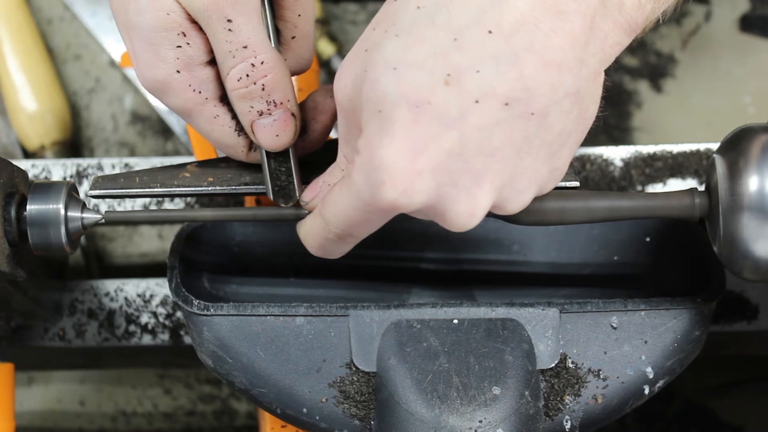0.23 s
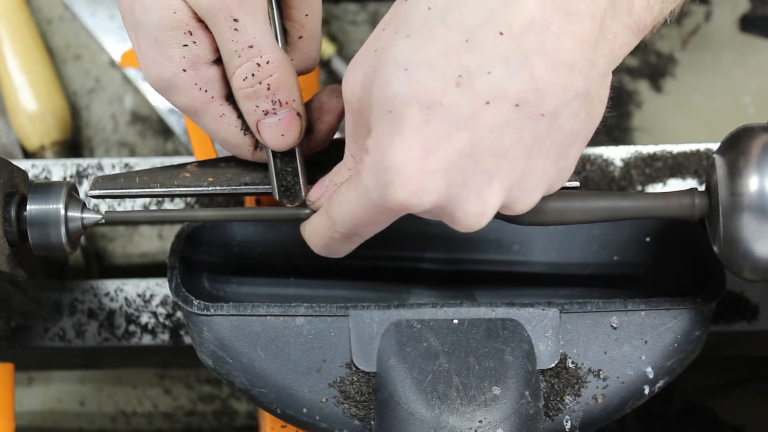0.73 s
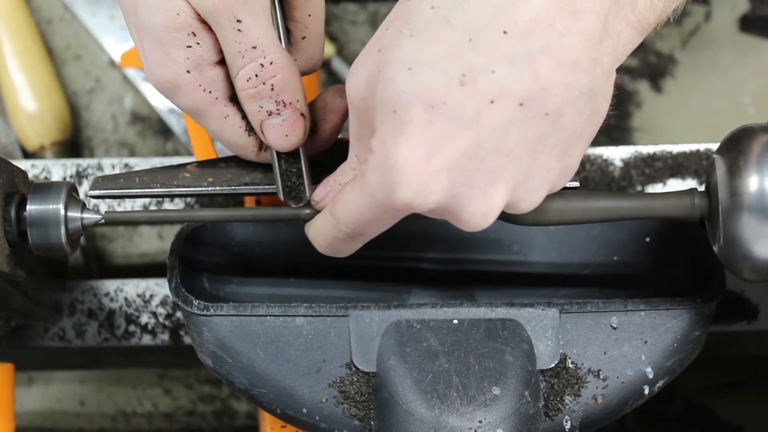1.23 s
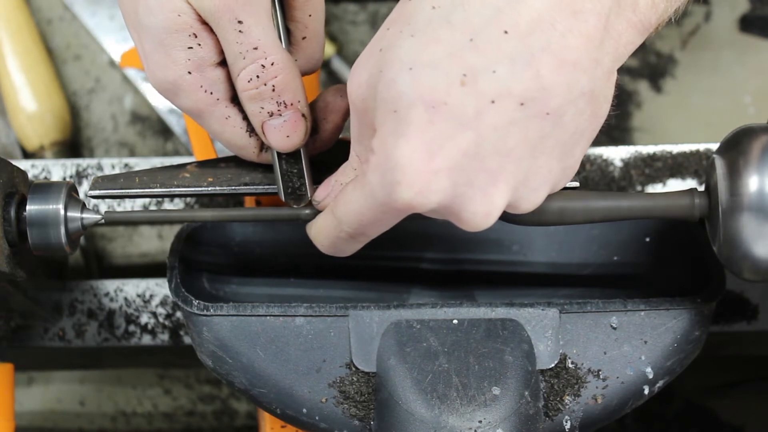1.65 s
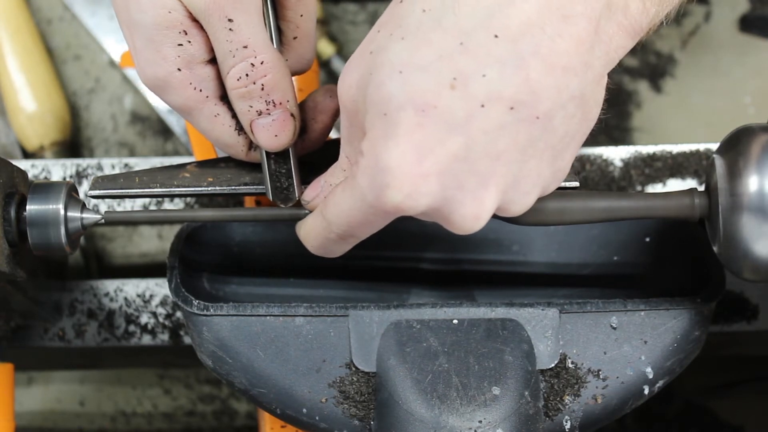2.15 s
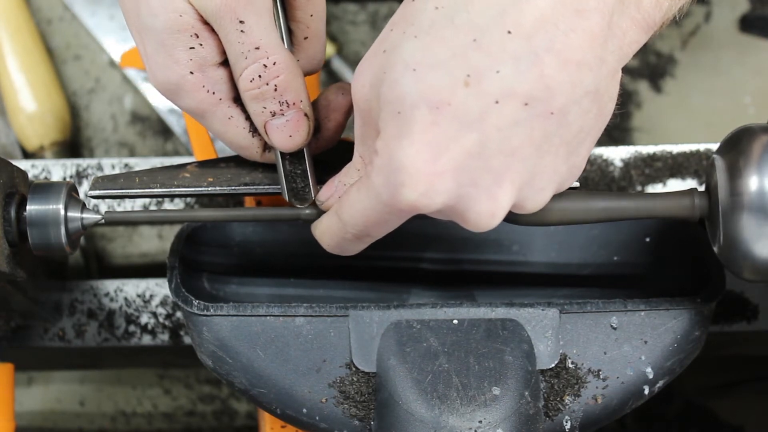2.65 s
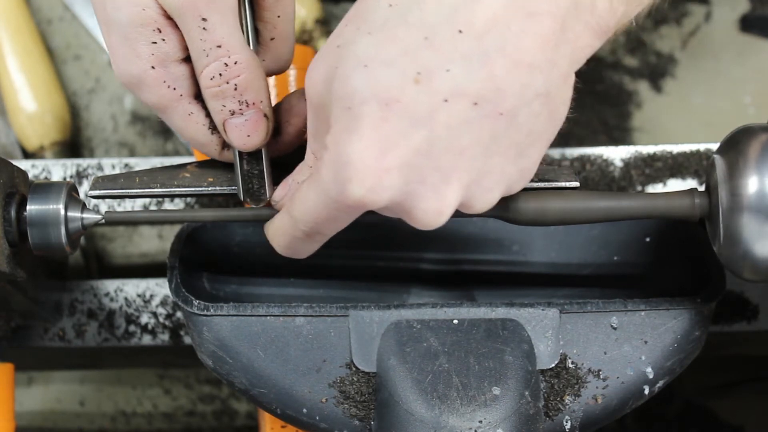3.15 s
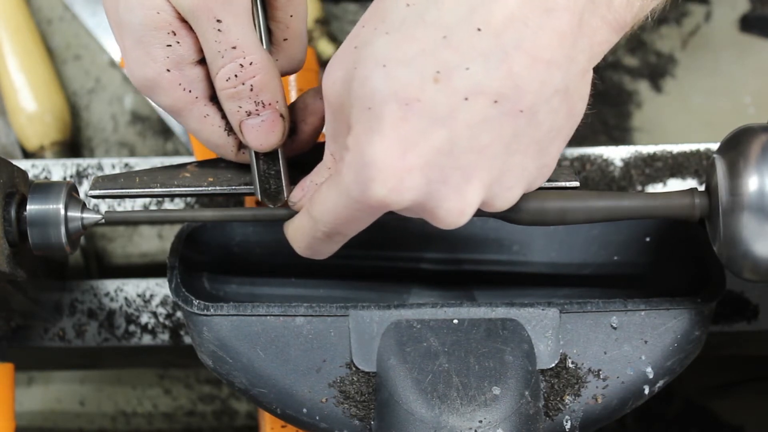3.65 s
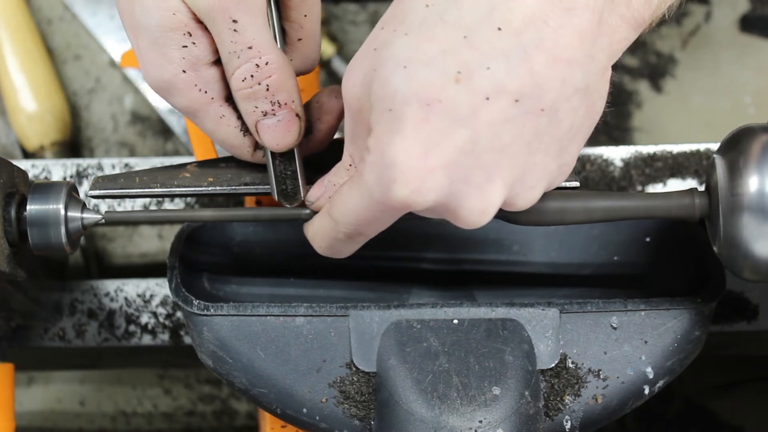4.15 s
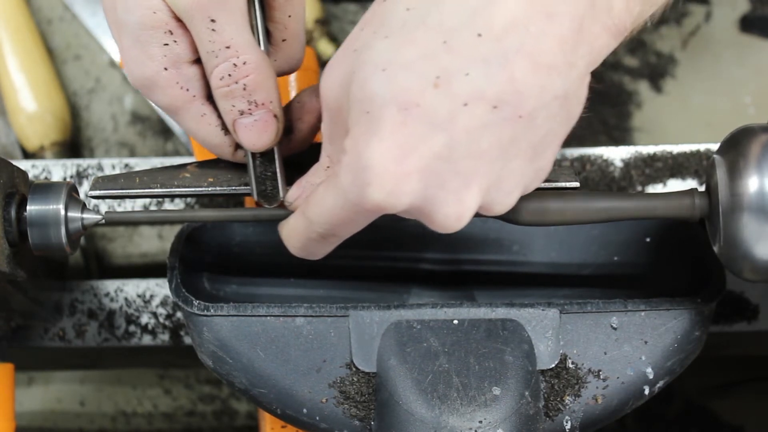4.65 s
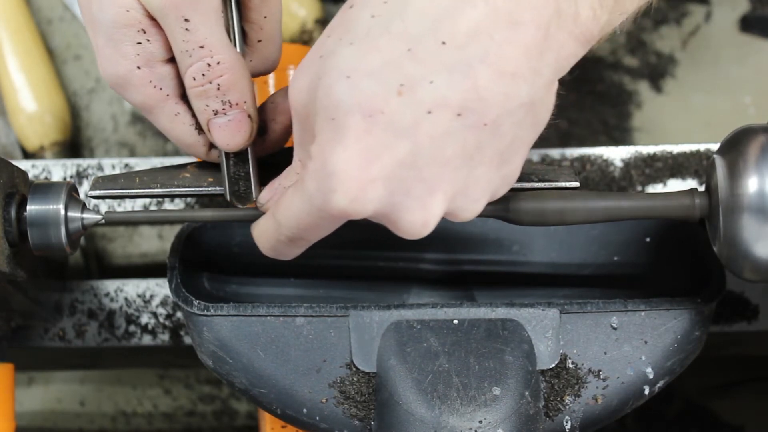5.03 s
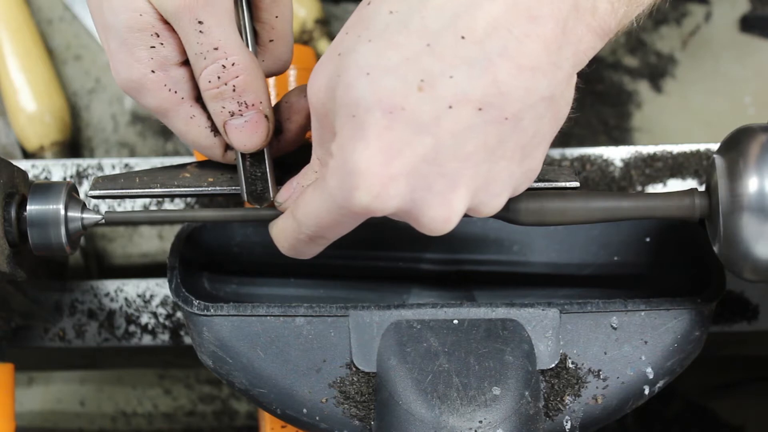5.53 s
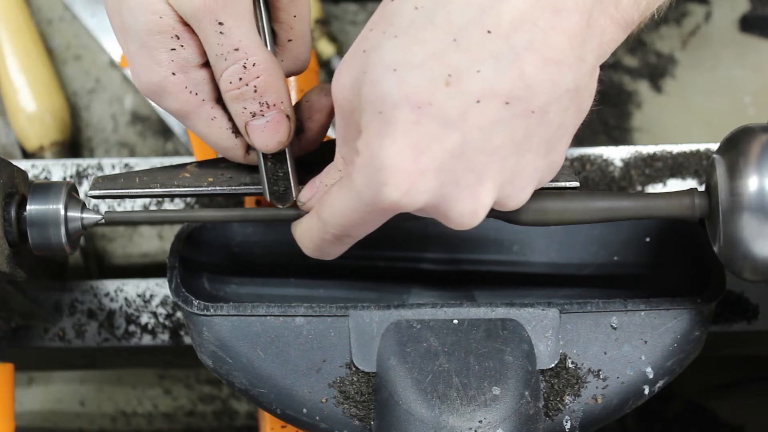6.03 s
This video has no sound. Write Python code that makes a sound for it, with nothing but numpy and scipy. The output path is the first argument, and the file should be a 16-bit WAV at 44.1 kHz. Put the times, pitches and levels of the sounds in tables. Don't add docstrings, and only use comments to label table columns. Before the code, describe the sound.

In a workshop, steel calipers press on a wooden blank turning in a lathe. A very high, glassy squeak flickers in short irregular strokes, dipping and biting again, with tiny chirps and wooden creaks. Around five seconds it drops to a lower, harder squeal, then returns high and dense. A faint low motor hum and soft hiss run beneath. The microphone is close and dry, without audible room.

```python
import sys
import numpy as np
from scipy import signal
from scipy.fft import rfft, irfft, next_fast_len
from scipy.io import wavfile
from scipy.ndimage import uniform_filter1d

SR = 44100
rng = np.random.default_rng(int(sys.argv[2]) if len(sys.argv) > 2 else 0)


def output_pcm(signal):
    pcm = np.clip(np.atleast_2d(signal).T, -1, 1) * 32767
    wavfile.write(sys.argv[1], SR, np.round(pcm).astype(np.int16))


def elevation(decibels):
    levels = np.asarray(decibels, float)
    return 10 ** (levels / 20)


N = 277387


def in_time(rows):
    s, *columns = np.transpose(rows)
    return [np.interp(np.arange(N) / SR, s, c) for c in columns]


def rms_one(x):
    return x / np.sqrt(np.mean(np.abs(x) ** 2) + 1e-20)


def low_pass(x, cut_hz, order):
    return signal.sosfilt(signal.butter(order, cut_hz, fs=SR, output="sos"), x)


def drift(rate_hz):
    smooth = signal.butter(2, rate_hz, fs=SR / 50, output="sos")
    coarse = signal.sosfilt(smooth, rng.standard_normal(N // 50 + 2002))
    settled = rms_one(coarse[2000:])
    return np.interp(np.arange(N) / 50, np.arange(N // 50 + 2), settled)


# frequency in Hz, level in dB per Hz.
HISS_SPECTRUM = [(110, -2), (150, -8), (370, -10), (520, 1), (640, -5.5), (720, -6.5), (950, -9),
                 (1300, -1), (2700, -10), (4300, -2), (6200, -4), (8300, -5.5), (9600, -16), (13400, -30)]
HISS_DB = -5


def hiss():
    hz, db = np.transpose(HISS_SPECTRUM)
    size = next_fast_len(N, True)
    grid = np.maximum(np.fft.rfftfreq(size, 1 / SR), 1)
    colour = elevation(np.interp(np.log(grid), np.log(hz), db))
    noise = irfft(rfft(rng.standard_normal(size)) * colour, size)[:N]
    return elevation(HISS_DB) * rms_one(noise)


# lower edge in Hz, upper edge in Hz, # squeak
# level in dB at which the band drops out, averaging time in seconds.
GAPPED_BANDS = [(9050, 9600, -41, .04), (9600, 10500, -44, .05), (10500, 11500, -43, .06),
                (11500, 12500, -41, .2), (12500, 14500, -41, .25)]


def gapped(quiet, squeak, soft_db=3.0, ragged_db=3.5):
    size = next_fast_len(N, True)
    spectrum, grid = rfft(quiet, size), np.fft.rfftfreq(size, 1 / SR)
    power_db = 10 * np.log10(uniform_filter1d(squeak ** 2, SR // 50) + 1e-12)
    for low_hz, high_hz, over_db, hold_s in GAPPED_BANDS:
        level_db = uniform_filter1d(power_db, int(hold_s * SR))
        gone = np.clip((level_db + ragged_db * drift(7.0) - over_db) / soft_db, 0, 1)
        band = irfft(spectrum * (grid > low_hz) * (grid <= high_hz), size)[:N]
        quiet = quiet - gone * band
    return quiet


MOTOR_HZ = 58.25
# multiple of the motor frequency, level in dB.
MOTOR_HARMONICS = [(1, 0.5), (2, -25), (3, -25.5), (4, -34), (5, -28), (6, -29), (7, -34)]
DRIVE_LINE_HZ = [50.0, 66.6, 88.2, 100.3, 208.6, 257.7, 315.6, 404, 433.4, 451.5, 491.2, 611.7, 1123, 1490,
                 2740, 3800, 4421, 4480]
# width in Hz, level in dB against the hum.
DRIVE_LINE_LEVELS = [(0.32, -29), (.2, -34), (2, -25), (2, -22), (1.4, -30.5), (2, -33.5), (3.87, -27),
                     (2.4, -37.5), (2, -27), (2, -34), (1.31, -14), (1.31, -22.5), (26.8, -23.5),
                     (24.6, -21.5), (20.1, -25.5), (30, -27), (8.8, -11.5), (50.8, -21)]


def lathe(swell_db=1.67):
    turn = 2 * np.pi * np.arange(N) / SR
    out = sum(elevation(db) * np.sin(k * MOTOR_HZ * turn + k * k) for k, db in MOTOR_HARMONICS)
    for hz, (width_hz, db) in zip(DRIVE_LINE_HZ, DRIVE_LINE_LEVELS):
        pitch_hz = hz + width_hz / 2 * drift(1.0 + width_hz / 2)
        phase = 2 * np.pi * np.cumsum(pitch_hz) / SR
        out += elevation(db + swell_db * drift(7.8)) * np.sin(phase)
    return np.sqrt(2) * out


SWAY_DB, SWAY_S, SWAY_DIP_S = 0.8, 2.07, 1.23


def belt_sway(sharp=2.6):
    turn = np.pi * (np.arange(N) / SR - SWAY_DIP_S) / SWAY_S
    return elevation(-2 * SWAY_DB * np.abs(np.cos(turn)) ** (2 * sharp))


def gain_control(squeak, knee_db=-40, share=0.19, memory_s=0.18):
    keep = np.exp(-1 / (memory_s * SR))
    start = [np.mean(squeak[:SR // 10] ** 2)]
    power = signal.lfilter([1 - keep], [1, -keep], squeak ** 2, zi=start)[0]
    return (1 + power / elevation(knee_db) ** 2) ** (-share)


def bed_drone(turned_down):
    load_hz, load_db = 404, -62.5
    return elevation(load_db) * (1 - turned_down) * np.sin(2 * np.pi * load_hz * np.arange(N) / SR)


def slips(spread_db):
    return elevation(spread_db * rng.exponential(1, N)) * np.exp(2j * np.pi * rng.random(N))


def sing(push, pitch_hz, width_hz, skirt=3.13, lean_hz=0.0):
    swing = np.exp(2j * np.pi * np.cumsum(pitch_hz * np.ones(len(push))) / SR)
    lean = np.exp(2j * np.pi * lean_hz * np.arange(len(push)) / SR)
    peak = low_pass(push, width_hz / 2, order=1)
    height = low_pass(peak * lean, skirt * width_hz / 2, order=5) / lean
    return np.sqrt(2) * np.real(rms_one(height) * swing)


def bites(rows, gain_db):
    swell_s, ring_s, early_s = .006, .007, .001
    out, t = np.zeros(N), np.arange(int(.06 * SR)) / SR
    swell = np.sin(np.pi / 2 * np.minimum(t / swell_s, 1)) ** 2
    shape = swell * np.exp(-(t / ring_s) ** 2)
    shape = shape / shape.max()
    for s, peak_db, hz in rows:
        at = int((s - early_s) * SR)
        ring = elevation(peak_db + gain_db) * shape * np.sin(2 * np.pi * hz * t)
        out[at:at + len(t)] += ring[:N - at]
    return out


def grab_push(flicker_db=0.5):
    return slips(1.6) * elevation(flicker_db * drift(40))


def grabbed(rows, push, slide_hz_per_s=0, rise_s=0.0088, fall_s=0.043, narrow=0.3):
    out = np.zeros(N)
    for s, length_s, hz, width_hz, level_db in rows:
        at = int(s * SR)
        size = min(int((length_s + fall_s / 2) * SR), N - at)
        t = np.arange(size) / SR
        ramp = np.clip(np.minimum(t / rise_s, t[::-1] / fall_s), 0, 1)
        shape = np.sin(np.pi / 2 * ramp) ** 2
        pitch_hz = hz - slide_hz_per_s * (t - length_s / 2) * (length_s < .05)
        mode = sing(push[at:at + size], pitch_hz, narrow * width_hz, skirt=5.46)
        out[at:at + size] += elevation(level_db) * shape * mode
    return out


# start in seconds, length in seconds, level in dB.
BLANK_CREAKS = [(0.052, 0.024, -54), (0.588, 0.077, -64.5), (0.97, 0.038, -60), (1.213, 0.051, -62.5),
                (1.365, 0.049, -58), (1.706, 0.084, -52), (4.078, 0.081, -50), (4.196, 0.17, -60),
                (4.285, 0.078, -50), (4.352, 0.036, -50.5), (4.382, 0.073, -49.5), (4.47, 0.048, -60),
                (4.556, 0.053, -61.5), (4.599, 0.061, -57), (4.711, 0.09, -69.5), (5.048, 0.029, -60.5),
                (5.108, 0.032, -59.5), (5.188, 0.021, -63)]
# time in seconds, peak level in dB, pitch in Hz.
BLANK_JOLTS = [(1.717, -41, 1357), (1.7386, -42, 1540), (4.0856, -48, 1390), (4.298, -36, 1420),
               (4.359, -30, 1477), (4.3904, -36, 1400), (4.4378, -41, 1430), (4.5007, -46, 1430),
               (4.6204, -45, 1460), (4.6448, -43, 1340), (5.1252, -49, 1370)]


def creaks(push):
    pitch_hz, hz_per_db, width_hz = 1420, 2.5, 212
    rows = [(s, length_s, pitch_hz + hz_per_db * (db + 50), width_hz, db) for s, length_s, db in BLANK_CREAKS]
    return grabbed(rows, push) + bites(BLANK_JOLTS, gain_db=-5.5)


# start in seconds, length in seconds, level in dB.
TIP_WHISTLES = [(3.345, .055, -73), (3.39, .1, -57), (3.498, .055, -71), (3.644, 0.11, -73.5),
                (4.02, 0.081, -82), (4.608, .082, -82), (4.834, 0.077, -67), (5.238, 0.042, -64),
                (5.477, 0.038, -65), (5.531, 0.056, -59.5), (5.624, 0.07, -62.5), (5.746, 0.12, -61),
                (5.92, .032, -69), (6.048, 0.031, -73), (6.15, 0.085, -83)]


def whistles(push):
    pitch_hz, width_hz = 10740, 320
    return grabbed([(s, length_s, pitch_hz, width_hz, db) for s, length_s, db in TIP_WHISTLES], push)


# start in seconds, length in seconds, pitch in Hz, level in dB.
REST_CHIRPS = [(.108, .022, 3730, -48.5), (.125, 0.028, 3630, -58), (.15, 0.032, 3830, -50.5),
               (.18, .03, 3690, -64), (.338, 0.022, 3750, -52), (1.262, 0.033, 898, -58.5),
               (1.266, 0.06, 1040, -53.5), (1.847, 0.046, 1760, -63.5), (.985, 0.021, 2680, -65),
               (2.54, 0.032, 2230, -70), (5.595, .025, 3500, -67), (2.347, 0.025, 1890, -65),
               (2.62, 0.02, 834, -61.5), (2.733, 0.041, 2700, -60), (2.972, 0.025, 2690, -58.5),
               (3.281, .03, 1093, -65.5), (3.362, 0.049, 3380, -63.5), (3.405, 0.088, 3390, -65),
               (3.388, 0.035, 1076, -66), (3.58, 0.04, 3370, -59), (3.666, 0.027, 3230, -63),
               (3.746, 0.028, 3390, -67), (4.98, 0.079, 529, -65.5), (5.655, 0.025, 1910, -65),
               (5.76, 0.051, 3430, -59), (5.919, 0.032, 3560, -69), (6.16, 0.034, 3440, -62),
               (6.225, 0.036, 3460, -67)]
# start in seconds, length in seconds, pitch in Hz, level in dB.
STEEL_CHIRPS = [(.44, 0.048, 12330, -79), (.47, .04, 7500, -59), (.792, 0.029, 7250, -66),
                (.99, 0.036, 7400, -56), (1.585, 0.045, 12000, -78), (1.66, 0.028, 7000, -59),
                (1.678, 0.015, 6050, -51.5), (1.802, 0.0354, 5650, -67), (3.961, 0.035, 4680, -67),
                (4.357, 0.042, 5120, -58.5), (4.36, 0.042, 6730, -59), (4.555, 0.051, 5050, -57.5),
                (5.222, 0.058, 11900, -70), (5.237, .04, 13550, -75), (5.33, .035, 13560, -78.5),
                (5.245, .04, 10400, -76), (4.98, 0.034, 6530, -48), (5.22, 0.043, 11480, -56),
                (5.22, 0.05, 12950, -70), (5.34, .02, 12950, -79), (5.226, 0.05, 4484, -51.5),
                (5.968, 0.051, 7980, -40)]


def chirps(push):
    width_hz = 224
    grabs = [*REST_CHIRPS, *STEEL_CHIRPS]
    rows = [(s, length_s, hz, width_hz, db) for s, length_s, hz, db in grabs]
    return grabbed(rows, push, slide_hz_per_s=2600)


# start in seconds, length in seconds, pitch in Hz, width in Hz, level in dB.
BAND_SWELLS = [(3.415, 0.052, 8730, 520, -46.5), (5.222, 0.076, 10530, 5000, -73),
               (5.335, 0.044, 9500, 4500, -75), (4.64, .11, 4421, 58, -56.5),
               (4.74, 0.12, 4530, 240, -58.5), (5.125, 0.14, 4421, 57, -57), (6.1, .06, 3550, 80, -65),
               (5.228, .055, 5780, 420, -52), (5.3, .09, 5880, 380, -54), (5.505, .03, 5750, 380, -58),
               (5.64, .07, 6380, 270, -54), (3.495, .075, 7900, 260, -48), (3.915, .05, 7900, 260, -51),
               (4.1, 0.087, 7860, 240, -56), (0.38, .07, 7820, 240, -60)]


def band_swells(push):
    return grabbed(BAND_SWELLS, push)


def strokes(rows, rise_db_per_s, fall_db_per_s, rest_db):
    t, level_db = np.arange(N) / SR, np.full(N, float(rest_db))
    for s, length_s, first_db, last_db in rows:
        near = slice(max(int((s - .3) * SR), 0), int((s + length_s + .3) * SR))
        ends = [s - 1, s, s + max(length_s, .001), s + length_s + 1]
        levels = [first_db - rise_db_per_s, first_db, last_db, last_db - fall_db_per_s]
        level_db[near] = np.maximum(level_db[near], np.interp(t[near], ends, levels))
    return level_db


def friction_mode(level_db, pitch_hz, width_hz, flicker_db, skirt, lean_hz, wander_hz=14, even=0.71):
    grip = rms_one(elevation(flicker_db * drift(44)))
    swing = grip * sing(slips(2.4), pitch_hz + wander_hz * drift(9), width_hz, skirt, lean_hz)
    held = uniform_filter1d(uniform_filter1d(swing ** 2, SR // 40), SR // 40)
    return elevation(level_db) * rms_one(swing / (held + .05) ** (even / 2))


SAG_HZ, SAG_S = 89.4, 0.03


def sag(rows):
    t = np.arange(N) / SR
    starts = np.sort([0] + [row[0] - .01 for row in rows[1:]])
    latest = starts[np.searchsorted(starts, t, "right") - 1]
    return SAG_HZ * np.exp(-(t - latest) / SAG_S)


# time in seconds, pitch in Hz.
JOINT_BEND = [(0, 6190), (1.1, 6090), (3.1, 6360), (3.2, 6035), (3.36, 6250), (3.46, 6190), (4.1, 6310),
              (4.52, 6290), (4.64, 6150), (5.03, 6190), (5.28, 6104), (5.35, 6203), (5.42, 6210),
              (5.62, 6173), (5.68, 6290), (5.76, 6132), (6.0, 6280), (6.29, 6014)]
# start in seconds, length in seconds,
# level at the start in dB, level at the end in dB.
JOINT_STROKES = [(0, 0.068, -60, -56.5), (.07, 0.042, -58.5, -47.5), (.22, 0.03, -60, -59),
                 (1.01, 0.013, -52.5, -65), (1.065, 0.018, -42, -54.5), (1.62, .03, -54.5, -63),
                 (3.174, 0.016, -39, -54), (3.36, 0.1, -50.5, -53), (3.5, 0.093, -58, -55),
                 (3.65, 0.083, -58, -53), (3.82, .1, -66, -65), (3.93, 0.03, -51, -47),
                 (4.05, 0.045, -50, -45.5), (4.14, 0.46, -56.5, -66.5), (4.61, 0.017, -53, -57),
                 (5.17, 0.032, -57, -44), (4.812, 0.053, -41.5, -55), (4.895, 0.0095, -39, -54.5),
                 (5.021, 0.088, -44, -48.5), (5.222, 0.039, -31.5, -27.5), (5.27, 0.069, -31, -40),
                 (5.34, 0.019, -25.5, -30.5), (5.44, 0.057, -52, -52), (5.5, 0.066, -43, -35.5),
                 (5.6, 0.027, -41, -39), (5.65, 0.062, -48, -47.5), (5.74, .14, -36.5, -62),
                 (5.89, 0.18, -62, -59), (6.105, 0.018, -47, -57), (6.14, 0.067, -63, -65)]


def joint():
    pitch_hz = in_time(JOINT_BEND)[0] + sag(JOINT_STROKES) - SAG_HZ / 3
    level_db = strokes(JOINT_STROKES, 1200, 380, rest_db=-79)
    return friction_mode(level_db, pitch_hz, width_hz=60, flicker_db=1.0, skirt=6.3, lean_hz=35)


# time in seconds, upper pitch in Hz, middle pitch in Hz, lower pitch in Hz.
LEG_DETUNING = [(0, 8610, 8350, 8055), (.3, 8576, 8350, 8055), (1.9, 8485, 8350, 8055),
                (3.0, 8510, 8350, 8055), (3.45, 8560, 8350, 8020), (3.6, 8590, 8320, 8030),
                (3.9, 8520, 8320, 8070), (4.14, 8563, 8300, 8030), (4.25, 8293, 8200, 7850),
                (4.4, 8500, 8300, 8040), (5.65, 8507, 8430, 8080), (5.9, 8584, 8330, 8080),
                (6.1, 8520, 8290, 8080), (6.29, 8480, 8270, 8080)]
# start in seconds, length in seconds,
# level at the start in dB, level at the end in dB.
UPPER_STROKES = [(0, 0.28, -32, -39), (.33, 0.042, -42.5, -38.5), (.46, 0.018, -35.5, -40.5),
                 (.6, 0.23, -55, -45.5), (.945, 0.008, -52, -47), (.98, 0.019, -35.5, -34.5),
                 (1.08, 0.26, -56.5, -56), (1.36, 0.054, -39, -40.5), (1.5, 0.13, -52.5, -35.5),
                 (1.96, 0.16, -48, -39.5), (2.19, .06, -39.5, -41), (2.32, 0.1, -35, -38.5),
                 (2.5, 0.12, -42.5, -51), (2.73, 0.0069, -49, -47), (2.78, 0.16, -60, -56.5),
                 (2.99, 0.042, -44, -45), (3.39, 0.0061, -47, -40), (3.44, 0.057, -37, -42),
                 (3.57, .45, -35, -40), (4.11, 0.058, -43.5, -41.5), (4.3, 0.31, -64, -43),
                 (4.67, .15, -49, -48), (5.21, 0.14, -49.5, -52), (5.54, 0.066, -50, -48.5),
                 (5.66, 0.38, -38.5, -35.5), (6.1, 0.069, -32, -47), (6.21, 0.048, -38.5, -43)]
# start in seconds, length in seconds,
# level at the start in dB, level at the end in dB.
MIDDLE_STROKES = [
    (3.43, 0.41, -45, -37.5),
    (3.91, 0.1, -30.5, -41),
    (4.11, 0.075, -41.5, -45.5),
    (5.65, 0.21, -62, -32.5),
    (5.9, 0.16, -37, -37.5),
    (6.09, 0.12, -36.5, -37.5),
    (6.2, 0.051, -37, -31.5),
]
# start in seconds, length in seconds,
# level at the start in dB, level at the end in dB.
LOWER_STROKES = [(0, 0.15, -39.5, -41), (.16, 0.15, -35.5, -51.5), (.38, 0.12, -40.5, -43),
                 (.55, 0.11, -53.5, -67), (.76, 0.088, -38.5, -42), (.99, 0.016, -49, -47),
                 (1.08, 0.16, -61, -67), (1.3, 0.11, -55, -49), (1.56, 0.14, -41, -42),
                 (1.84, 0.19, -57, -35.5), (2.02, 0.21, -35.5, -47.5), (2.235, 0.19, -34, -42.5),
                 (2.39, 0.047, -37, -45), (2.45, 0.18, -43, -66), (2.72, .02, -51, -61),
                 (2.81, 0.057, -52, -42.5), (2.92, 0.072, -44.5, -37), (3.0, 0.038, -36, -43),
                 (3.09, 0.077, -66, -47), (3.24, 0.26, -70, -45.5), (3.51, 0.065, -40.5, -37.5),
                 (3.67, 0.19, -42.5, -43), (3.915, 0.046, -41.5, -45), (4.0, 0.059, -38.5, -48),
                 (4.1, 0.1, -44.5, -47), (4.3, 0.34, -67, -60), (4.66, .2, -73, -74), (5.7, 0.32, -69, -43),
                 (6.09, 0.079, -32, -41), (6.19, 0.041, -44, -37)]


def legs():
    upper_hz, middle_hz, lower_hz = in_time(LEG_DETUNING)
    upper_db = strokes(UPPER_STROKES, 480, 260, rest_db=-75)
    middle_db = strokes(MIDDLE_STROKES, 300, 300, rest_db=-88)
    lower_db = strokes(LOWER_STROKES, 490, 280, rest_db=-76)
    out = friction_mode(upper_db, upper_hz, width_hz=64, flicker_db=1.5, skirt=5.9, lean_hz=60)
    out += friction_mode(middle_db, middle_hz, width_hz=163, flicker_db=-1.0, skirt=2.9, lean_hz=3.7,
                         wander_hz=39.74)
    out += friction_mode(lower_db, lower_hz, width_hz=50, flicker_db=0.5, skirt=5.6, lean_hz=10)
    return out


def sticking(rows, before_s=0.00029, spread_s=0.0053):
    stick_db = -7
    t, dip = np.arange(N) / SR, np.zeros(N)
    for s, peak_db, hz in rows:
        near = slice(max(int((s - .03) * SR), 0), int((s + .02) * SR))
        dip[near] += np.exp(-((t[near] - s + before_s) / spread_s) ** 2)
    return elevation(stick_db * np.minimum(dip, 1))


# time in seconds, peak level in dB, pitch in Hz.
UPPER_LEG_BITES = [(0.0253, -31, 8560), (0.0498, -31.5, 8620), (0.0828, -27, 8600), (0.2556, -34, 8580),
                   (0.3598, -27.5, 8530), (0.4594, -31, 8350), (0.758, -34, 8520), (0.9384, -31.5, 8620),
                   (0.9822, -24, 8480), (1.3573, -32, 8570), (1.6237, -30, 8560), (2.1834, -32, 8500),
                   (2.2338, -32, 8490), (2.289, -32, 8400), (2.3163, -33, 8520), (2.4994, -34, 8520),
                   (2.7154, -33, 8480), (3.3807, -37, 8510), (3.43, -36, 8570), (3.5553, -28, 8510),
                   (3.595, -24.5, 8590), (3.6173, -25, 8640), (3.717, -23.5, 8610), (3.77, -27.5, 8590),
                   (3.803, -22.5, 8510), (3.8462, -28.5, 8590), (3.8631, -27.5, 8550), (3.898, -28, 8610),
                   (3.9489, -27.5, 8480), (3.9834, -29, 8580), (4.678, -37, 8510), (4.802, -34.5, 8600),
                   (5.6403, -30.5, 8570), (5.662, -24, 8530), (5.6995, -26, 8460), (5.781, -29, 8580),
                   (5.8287, -26, 8520), (5.8898, -23.5, 8590), (5.9514, -27, 8600), (5.9958, -22.5, 8470),
                   (6.0195, -27, 8340), (6.091, -20, 8330), (6.1749, -26, 8300), (6.2099, -20, 8300)]
# time in seconds, peak level in dB, pitch in Hz.
LOWER_LEG_BITES = [(0.0706, -27.5, 8100), (0.157, -28, 8180), (0.2598, -35.5, 8020), (0.3606, -40, 8050),
                   (0.7592, -32.5, 8050), (0.7932, -34, 8150), (0.9842, -39, 8120), (1.5584, -33, 8050),
                   (1.6106, -29, 8060), (1.6279, -25, 8060), (1.9624, -34, 8000), (2.2365, -29.5, 8050),
                   (2.255, -25, 8050), (2.2876, -25, 8000), (2.382, -28, 8170), (3.549, -27.5, 8020),
                   (3.6626, -28.5, 8100), (3.8053, -29, 8160), (3.919, -26.5, 8090), (4.0133, -31, 8190),
                   (4.0931, -37, 8030), (5.9789, -27.5, 8030), (6.117, -25, 8200)]
# time in seconds, peak level in dB, pitch in Hz.
CALIPER_JOINT_BITES = [(3.1697, -36, 6110), (3.3667, -46, 6150), (3.9365, -40, 6310), (3.9574, -36, 6320),
                       (4.0507, -45, 6400), (4.815, -35, 6130), (4.8928, -35, 6080), (5.02, -29, 6160),
                       (5.064, -36.5, 6140), (5.1889, -37, 6230), (5.221, -28.5, 6065), (5.24, -23.5, 6130),
                       (5.288, -26.5, 6110), (5.3441, -19.5, 6370), (5.435, -40.5, 6190),
                       (5.4974, -39, 6330), (5.5343, -29, 6080), (5.6107, -30.5, 6150),
                       (5.7363, -34.5, 6150)]


def caliper_squeak(leg_sound):
    out = sticking([*UPPER_LEG_BITES, *LOWER_LEG_BITES]) * leg_sound
    out += sticking(CALIPER_JOINT_BITES) * joint()
    out += bites(UPPER_LEG_BITES, gain_db=-2.0)
    out += bites(LOWER_LEG_BITES, gain_db=-0.5)
    out += bites(CALIPER_JOINT_BITES, gain_db=-1.5)
    return out


def scene():
    hum_db = -54.5
    leg_sound = legs()
    squeak = caliper_squeak(leg_sound)
    turned_down = gain_control(squeak)
    machine = lathe() + gapped(hiss(), leg_sound)
    machine = elevation(hum_db) * turned_down * belt_sway() * machine + bed_drone(turned_down)
    push = grab_push()
    grabs = creaks(push) + whistles(push) + chirps(push) + band_swells(push)
    return (machine + grabs + squeak)[None]


def top_cut(x):
    return signal.sosfilt(signal.butter(12, 13530, fs=SR, output="sos"), x)


def record(dry):
    return top_cut(dry)


dry = scene()
out = record(dry)
output_pcm(out)
```